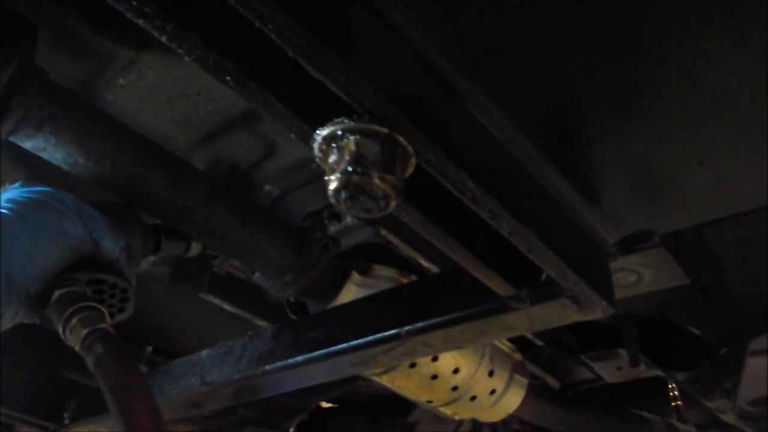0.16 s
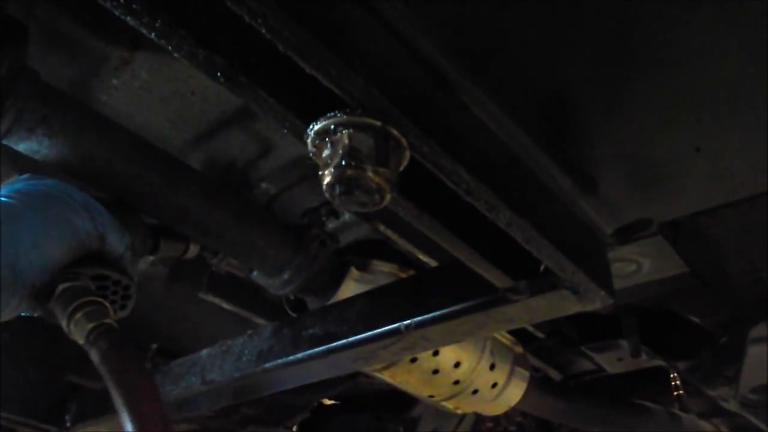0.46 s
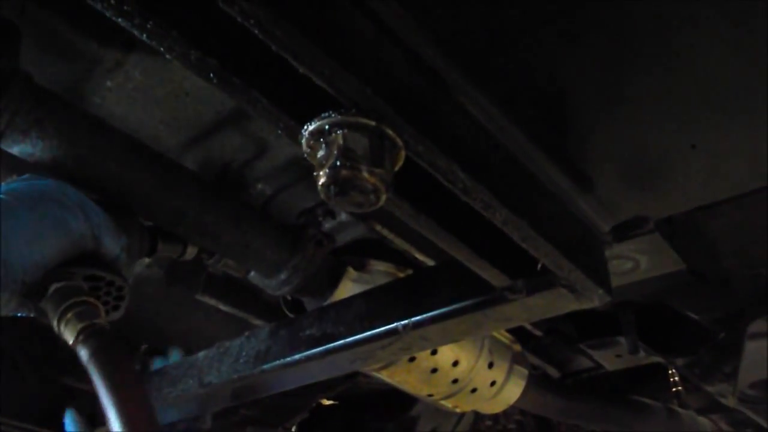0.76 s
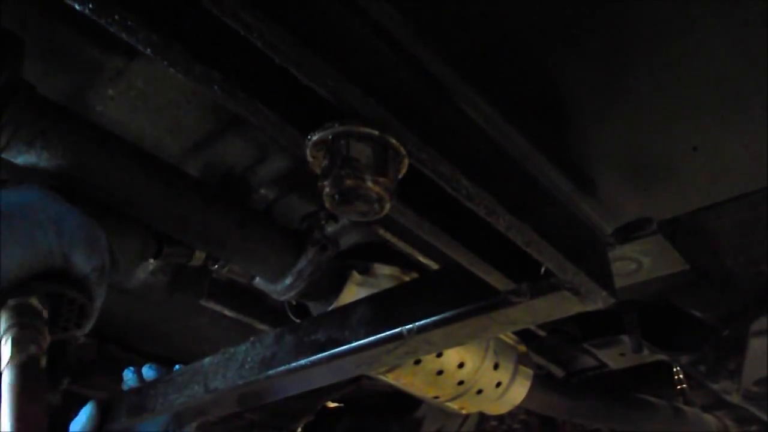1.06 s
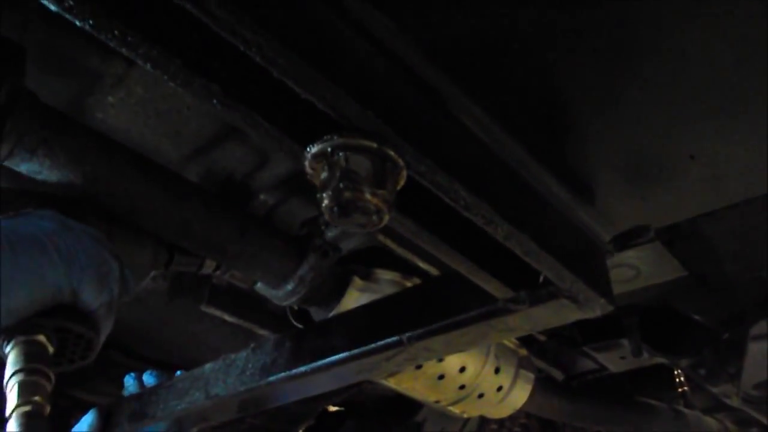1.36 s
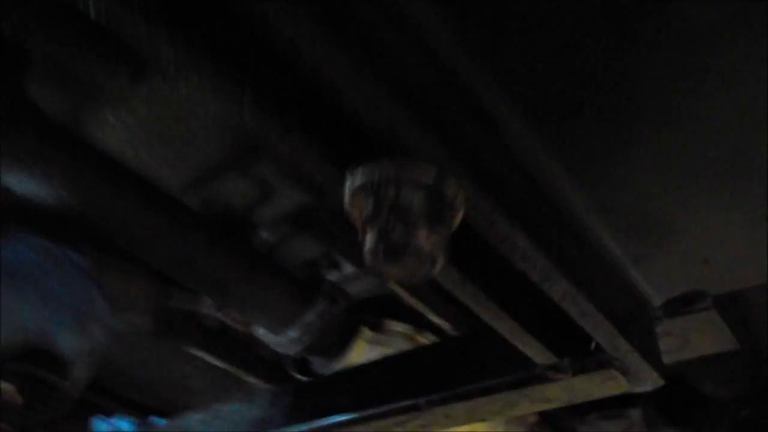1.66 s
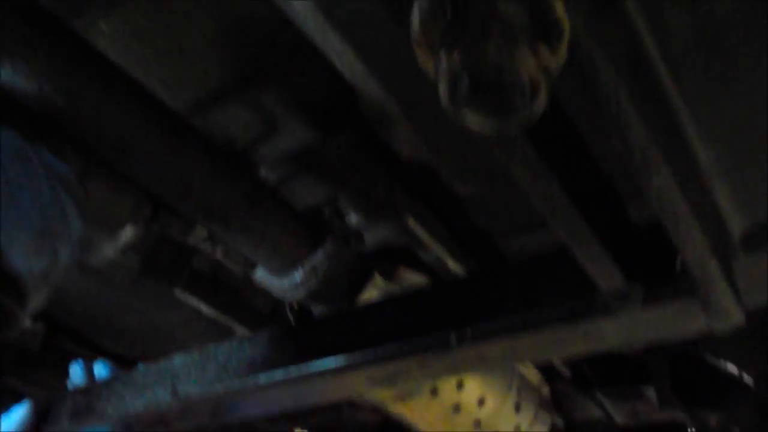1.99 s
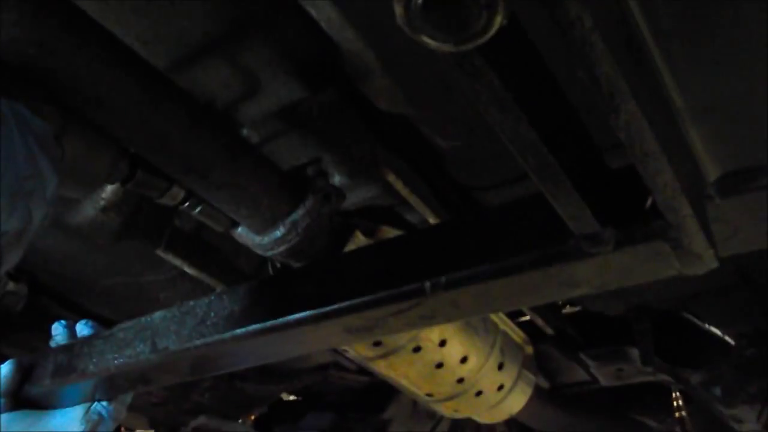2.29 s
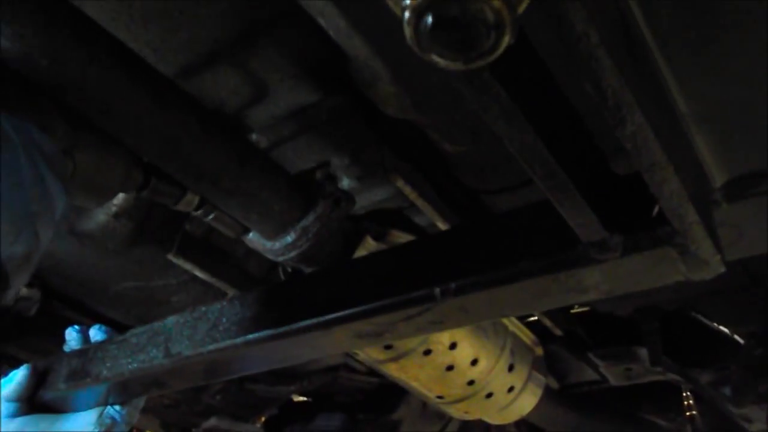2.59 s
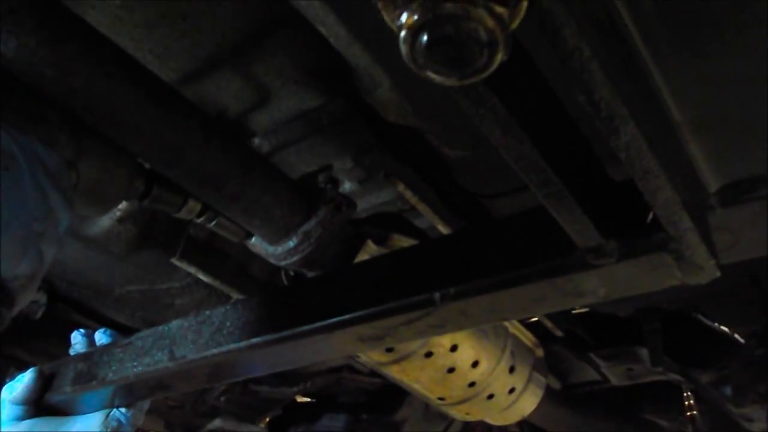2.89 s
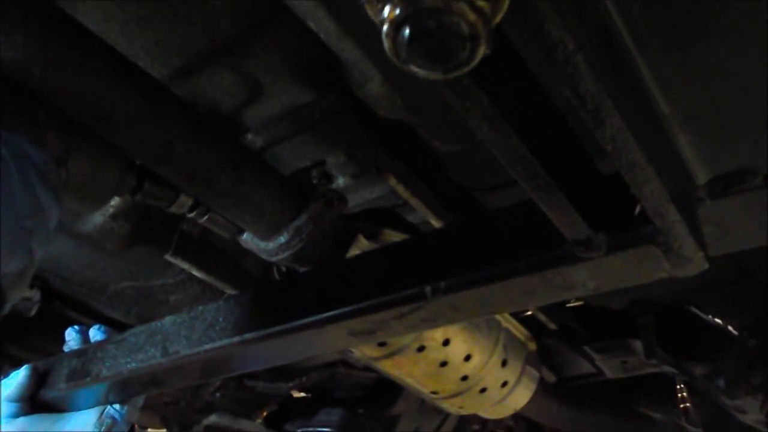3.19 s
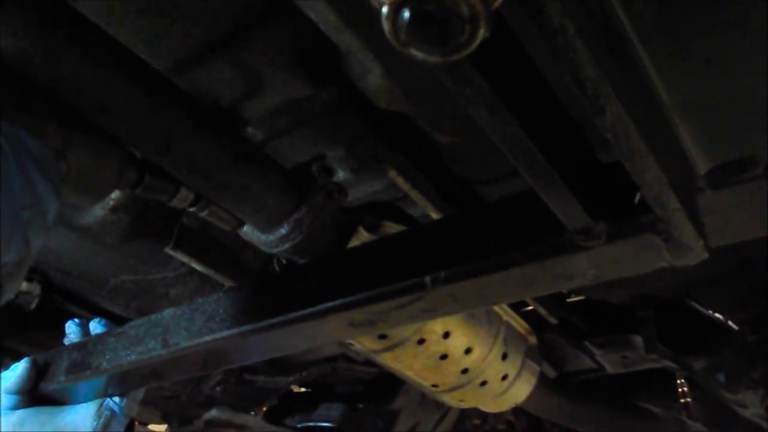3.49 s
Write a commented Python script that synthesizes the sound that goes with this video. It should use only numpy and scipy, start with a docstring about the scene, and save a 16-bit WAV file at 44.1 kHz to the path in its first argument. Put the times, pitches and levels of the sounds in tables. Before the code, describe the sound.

A pneumatic chisel works on a rusted bolt beneath a car. Faint steel knocks come at 0 to 0.5 s, then around 0.95 s, ending in a hard bright rap at 1.1 s that echoes in the garage. Air hisses with a rising whistle from 1.55 s. From 1.73 s harsh hammering, about 17 blows a second, clangs and flutters, overloading the close microphone until the cut at about 3.65 s. Thin whine and faint noise lie behind.

```python
"""A few light knocks and a hard rap of steel, a hiss of air, then hammering at about 17 blows a second.
An air chisel works on a rusted bolt under a car in a garage, close to a small microphone.
Knocks and blows are noise bursts that ring the steel; the hiss is shaped noise from the opening valve.
Between blows the exhaust flutters in quickening pressure puffs that overload the microphone.
Low gusts, a thin electric whine and a noise floor lie behind; decaying noise makes the garage echo."""
import sys
import numpy as np
from scipy import signal
from scipy.fft import rfft, irfft, next_fast_len
from scipy.io import wavfile
from scipy.ndimage import uniform_filter1d

SR = 44100
rng = np.random.default_rng(int(sys.argv[2]) if len(sys.argv) > 2 else 0)


def dump(signal):
    """Clip the signal to [-1, 1] and save it as 16-bit WAV at the path in sys.argv[1]."""
    limited = np.clip(np.atleast_2d(signal).T, -1, 1)
    pcm = np.round(limited * 32767).astype(np.int16)
    wavfile.write(sys.argv[1], SR, pcm)


N = 160965   # length in samples

# Colour of the blows. Each row: frequency in Hz, relative level in dB per Hz.
CLANG_COLOUR = [(180, -17), (652, -10), (953, -2.5), (1240, -1), (2980, 0), (8560, -10), (15500, -26.5)]
# Resonances of bolt and frame. Each row: frequency in Hz, width in Hz, relative level in dB.
STEEL_MODES = [(420, 70, -3), (1375, 80, -1), (1895, 28, 8), (2208, 35, 6), (3060, 130, 3), (3530, 30, 0),
               (8560, 50, -8)]
CLANG_DB, STEEL_RING_DB, CRACK_DB = -16.5, -1.5, -1
CHATTER_T60_S, CRACK_T60_S, CHATTER_ROUGH_DB = 0.21, 0.18, 7.5   # t60: time to fall by 60 dB
BLOW_LAG_S, MODE_SPREAD_DB = 0.003, 8   # blows fall just after each run of puffs
# The loose bit rattles in its holder
TICKS_PER_S, TICK_DB, TICK_SPREAD_DB, TICK_T60_S = 100, 2.5, 3, 0.01

# Runs of exhaust puffs. Each row: first puff in seconds, last puff in seconds, number of puffs.
PUFF_RUNS = [(1.7288, 1.7718, 7), (1.7992, 1.8257, 6), (1.8517, 1.8828, 7), (1.9068, 1.9389, 7),
             (1.9621, 1.9993, 8), (2.0152, 2.0495, 7), (2.0818, 2.1078, 6), (2.1295, 2.1564, 6),
             (2.193, 2.224, 7), (2.2535, 2.2882, 7), (2.3128, 2.3508, 7), (2.3706, 2.401, 7),
             (2.43, 2.4579, 6), (2.4808, 2.5061, 6), (2.5327, 2.5664, 7), (2.5926, 2.6257, 7),
             (2.6463, 2.6772, 6), (2.7041, 2.7407, 7), (2.7639, 2.8029, 7), (2.8381, 2.8673, 6),
             (2.8833, 2.9062, 6), (2.9381, 2.9726, 7), (2.9939, 3.0297, 7), (3.0537, 3.0818, 6),
             (3.1043, 3.1322, 6), (3.1701, 3.2044, 7), (3.2284, 3.2608, 7), (3.2837, 3.3196, 7),
             (3.3586, 3.3864, 6), (3.4185, 3.4472, 6), (3.4624, 3.4954, 7), (3.5225, 3.5488, 6),
             (3.5688, 3.5927, 6), (3.6132, 3.64, 6)]
FIRST_PUFF_S = 1.6866   # a lone puff as the piston starts
SHORTEST_GAP_S, GAP_GROWTH = 0.003, 1.45   # gaps close in on the shortest
PUFF_DB, PUFF_SPREAD_DB, PUFF_LOW_HZ = 4, 3.5, 94   # level before the filters; low cut
LAST_PUFF_WIDTH_S, PUFF_WIDTH_PER_GAP = 0.00016, 0.011
JET_DB, JET_T60_S, JET_HZ = -51, 0.045, 2430   # each puff carries a spit of hiss
DIP_HZ, DIP_WIDTH_HZ, DIP_SHARE = 588, 255, 0.5   # the port passes little here
PORT_HZ, PORT_WIDTH_HZ, PORT_DB = 956, 98, 3.5   # the exhaust port rings after each puff
CHAMBER_HZ, CHAMBER_WIDTH_HZ, CHAMBER_DB = 170, 12.7, 3   # the cylinder booms under it

# Hiss of the opening valve. Each row: time in seconds, level in dB.
AIR_LEVEL = [(1.548, -47), (1.556, -21), (1.65, -9.5), (1.686, -14), (1.725, -12.5), (1.74, -50)]
# Colour of that hiss. Each row: frequency in Hz, relative level in dB per Hz.
AIR_COLOUR = [(656, -7.5), (1040, 5), (1910, -2.5), (3700, 0.5), (5030, -7), (9920, 2), (15500, -12)]
# Resonances of the air pipes. Each row: frequency in Hz, width in Hz, relative level in dB.
AIR_PIPES = [(1060, 110, 6), (6200, 690, 6), (7500, 200, 5), (9730, 140, 14.5)]
AIR_RING_DB = -4.5
# Whistle of a throat in the valve. Each row: time in seconds, frequency in Hz, level in dB.
WHISTLE_PATH = [(1.552, 2544, -34.5), (1.65, 2582, -16), (1.728, 2800, -16), (1.74, 2960, -32)]
# Tone of the filling cylinder. Each row: time in seconds, frequency in Hz, level in dB.
CAVITY_PATH = [(1.556, 568, -51), (1.582, 423, -28), (1.635, 180, -48), (1.67, 150, -36)]
WHISTLE_WIDTH_HZ, CAVITY_WIDTH_HZ = 300, 80

# Knocks of the tool on the car. Each row: start in seconds, level in dB, t60 of the contact in seconds.
KNOCKS = [(0.0, -30.5, 0.27), (0.287, -32.5, 0.18), (0.369, -35, 0.36), (0.464, -28, 0.094),
          (0.484, -28.5, 0.074), (0.497, -40, 0.045), (0.928, -32, 0.17), (.951, -20.5, 0.053),
          (1.048, -15.5, 0.14), (1.084, -13, 0.093), (1.1, 0, 0.074)]
# Colour of the knocks. Each row: frequency in Hz, relative level in dB per Hz.
KNOCK_COLOUR = [(300, -17.5), (800, -12), (1100, -8.5), (2200, 2), (3200, -5), (4200, -12.5), (15000, -42)]
# Resonances rung by the knocks. Each row: frequency in Hz, width in Hz, relative level in dB.
KNOCK_MODES = [(216, 15, -3), (450, 31, -1.5), (974, 51, -1.5), (1740, 30, 11.5), (2220, 55, -14)]
KNOCK_RING_DB = -1.5
# Bright clicks among the knocks. Each row: start in seconds, level in dB, t60 in seconds.
CLICKS = [(1.049, -17.5, 0.036), (1.085, -3, 0.036), (1.095, -4.5, 0.058)]
TREBLE_HZ = 5200   # the clicks fill the octave above this

# Low buffeting at the microphone. Each row: time in seconds, level in dB.
GUSTS = [(1.05, -64), (1.15, -23.5), (1.5, -44), (1.7, -24), (1.99, -20), (2.03, -12), (2.08, -20),
         (3.65, -25)]
GUST_TOP_HZ = 54
WHINE_HZ, WHINE_DB = 10650, -40.5
WHINE_FLIP_S, WHINE_ONE_FLIP_S, WHINE_EDGE = 0.01236, 0.5549, 27   # flip spacing, time of one flip, sharpness
# Colour of the steady noise floor. Each row: frequency in Hz, relative level in dB per Hz.
FLOOR_COLOUR = [(20, -18), (98, -4.5), (162, -19.5), (840, -23.5), (8270, -34.5), (10600, -33),
                (15700, -43)]
FLOOR_DB = -43.5

# How fast the garage echo dies. Each row: frequency in Hz, t60 in seconds.
GARAGE_DECAY = [(1800, 0.61), (9000, 0.63), (14000, 0.05)]
TOOL_ROOM_DB, EXHAUST_ROOM_DB = -6, -20.5   # how strongly each one feeds the echo
LIMIT_DB, RELEASE_DB_PER_S = 0.1, 1128
MIC_LOW_HZ, CUTOFF_HZ = 28.6, 15850


def amp(db):
    """Turn decibels into a plain factor."""
    return 10 ** (np.asarray(db) / 20)


def rms_one(x):
    """Scale to an average strength (rms) of 1."""
    return x / np.sqrt(np.mean(x ** 2) + 1e-20)


def butter(order, hz, kind, x):
    """Filter a sound with a smooth low, high or band filter."""
    return signal.sosfilt(signal.butter(order, hz, kind, fs=SR, output="sos"), x)


def curve(rows):
    """Gain in time from rows of seconds and dB; practically silent outside them."""
    s, db = np.transpose(rows)
    return amp(np.interp(np.arange(N) / SR, s, db, left=-120, right=-120))


def at_hz(points, hz):
    """Read a table between its rows, along a logarithmic frequency scale."""
    table = np.array(points)
    return np.interp(np.log(hz), np.log(table[:, 0]), table[:, 1])


def resonance(x, hz, width_hz):
    """A part that rings at one frequency; the narrower, the longer it rings."""
    r = np.exp(-np.pi * width_hz / SR)
    feedback = [1, -2 * r * np.cos(2 * np.pi * hz / SR), r * r]
    return signal.lfilter([(1 - r * r) / 2, 0, (r * r - 1) / 2], feedback, x + 1e-18)


def body(x, spectrum, peaks=(), ring_db=0, strengths=None):
    """A broad colour that keeps white noise at its rms, plus resonances, each with its own drive if given."""
    size = next_fast_len(N + 4096)
    hz = np.maximum(np.arange(size // 2 + 1) * SR / size, 1)
    gain = rms_one(amp(at_hz(spectrum, hz)))
    out = irfft(rfft(x, size) * gain, size)[:N]
    top = amp(ring_db) * gain.max()
    for k, (hz, width, db) in enumerate(peaks):
        drive = x if strengths is None else x * strengths[k]
        out = out + top * (-1) ** k * amp(db) * resonance(drive, hz, width)   # alternate signs
    return out


def bursts(times, dbs, t60s):
    """Sudden starts that die away exponentially; where they overlap, the louder one counts."""
    out, t = np.zeros(N), np.arange(N) / SR
    for s, db, t60 in zip(times, dbs, t60s):
        i = int(max(s, 0) * SR)
        out[i:] = np.maximum(out[i:], amp(db - 60 * t[:N - i] / t60))
    return out


def rattle(chatter, first_s):
    """Random small ticks of the loose bit, thinning in strength after each blow."""
    born = (rng.random(N) < TICKS_PER_S / SR) & (np.arange(N) > first_s * SR)
    spread = np.minimum(rng.exponential(1, N), 3)
    ticks = born * np.sqrt(chatter) * amp(TICK_DB + TICK_SPREAD_DB * spread)
    decay_per_sample = amp(-60 / (TICK_T60_S * SR))
    return signal.lfilter([1], [1, -decay_per_sample], ticks + 1e-18)


def chisel():
    """Each blow cracks, then the bit chatters unevenly on the bolt and keeps the steel ringing."""
    s = np.array(PUFF_RUNS)[:, 1] + BLOW_LAG_S
    chatter = bursts(s, s * 0, s * 0 + CHATTER_T60_S)
    crack = bursts(s, s * 0 + CRACK_DB, s * 0 + CRACK_T60_S)
    # Every blow favours other resonances
    favour = np.tanh(rng.standard_normal((len(STEEL_MODES), len(s))))
    blow = np.maximum(np.searchsorted(s, np.arange(N) / SR) - 1, 0)
    strengths = amp(MODE_SPREAD_DB * favour)[:, blow]
    uneven = amp(CHATTER_ROUGH_DB * rms_one(uniform_filter1d(rng.standard_normal(N), size=40)))
    envelope = uneven * chatter + crack + rattle(chatter, s[0])
    noise = envelope * rng.standard_normal(N)
    return amp(CLANG_DB) * body(noise, CLANG_COLOUR, STEEL_MODES, STEEL_RING_DB, strengths)


def puff_times():
    """List each puff's time, width and random level draw; a longer gap after it makes it broader."""
    puffs = [(FIRST_PUFF_S, LAST_PUFF_WIDTH_S, 0)]
    for first, last, count in PUFF_RUNS:
        count = round(count)
        share = GAP_GROWTH ** -np.arange(count - 1.)
        spare = last - first - len(share) * SHORTEST_GAP_S
        gaps = SHORTEST_GAP_S + spare * share / share.sum()
        widths = LAST_PUFF_WIDTH_S + PUFF_WIDTH_PER_GAP * (np.append(gaps, gaps[-1]) - gaps[-1])
        times = first + np.append(0, np.cumsum(gaps))
        puffs += zip(times, widths, rng.standard_normal(count))
    return puffs


def exhaust():
    """One-sided pressure puffs, each with a spit of hiss, ring the port and boom in the cylinder."""
    out, t = np.zeros(N), np.arange(-300, 301) / SR
    puffs = puff_times()
    for s, width, draw in puffs:
        i = int(s * SR)
        out[i - 300:i + 301] += amp(PUFF_DB + PUFF_SPREAD_DB * draw) * np.exp(-.5 * (t / width) ** 2)
    s, _, draw = np.transpose(puffs)
    spits = bursts(s, JET_DB + PUFF_SPREAD_DB * draw, s * 0 + JET_T60_S) * rng.standard_normal(N)
    hiss = butter(1, [JET_HZ / 2, 2 * JET_HZ], "band", spits)
    out = butter(2, PUFF_LOW_HZ, "high", out)
    out = out - DIP_SHARE * resonance(out, DIP_HZ, DIP_WIDTH_HZ)
    boom = amp(CHAMBER_DB) * resonance(out, CHAMBER_HZ, CHAMBER_WIDTH_HZ)
    ring = amp(PORT_DB) * resonance(out, PORT_HZ, PORT_WIDTH_HZ)
    return out + hiss + boom + ring


def swept(rows, width_hz):
    """Noise in a narrow band whose centre and level follow rows of seconds, Hz and dB."""
    s, hz, db = np.transpose(rows)
    slow = butter(2, width_hz / 2, "low", rng.standard_normal((2, N)))
    phase = 2 * np.pi * np.cumsum(np.interp(np.arange(N) / SR, s, hz)) / SR
    band = slow[0] * np.cos(phase) + slow[1] * np.sin(phase)
    return curve(np.transpose([s, db])) * rms_one(band)


def valve():
    """Air rushes through the pipes as broad hiss, with a rising whistle and a falling cylinder tone."""
    noise = body(rng.standard_normal(N), AIR_COLOUR, AIR_PIPES, AIR_RING_DB)
    hiss = curve(AIR_LEVEL) * rms_one(noise)
    return hiss + swept(WHISTLE_PATH, WHISTLE_WIDTH_HZ) + swept(CAVITY_PATH, CAVITY_WIDTH_HZ)


def knocks():
    """Short rough contacts with a soft start ring the frame."""
    envelope = uniform_filter1d(bursts(*np.transpose(KNOCKS)), size=120)
    return body(rng.standard_normal(N) * envelope, KNOCK_COLOUR, KNOCK_MODES, KNOCK_RING_DB)


def clicks():
    """Bright ticks among the knocks: short bursts of treble noise without ringing steel."""
    high = butter(2, [TREBLE_HZ, 2 * TREBLE_HZ], "band", rng.standard_normal(N))
    return high * bursts(*np.transpose(CLICKS))


def garage(x):
    """Echo of the walls: octave bands of noise, each dying at its own rate."""
    t, tail = np.arange(SR) / SR, 0
    for low in 60 * 2. ** np.arange(8):
        band = butter(2, [low, 2 * low], "band", rng.standard_normal(SR))
        decay = amp(-60 * t / at_hz(GARAGE_DECAY, low * np.sqrt(2)))
        tail = tail + band * decay * np.minimum(t / 0.0059, 1)   # the echo builds up over 5.9 ms
    return signal.fftconvolve(x, tail / np.sqrt(np.sum(tail ** 2)))[:N]


def gusts():
    """Buffeting as lumpy low noise that swells and fades."""
    low = butter(2, [6, GUST_TOP_HZ], "band", rng.standard_normal(N))
    return curve(GUSTS) * rms_one(low)


def whine():
    """A high electric tone whose sign flips regularly."""
    t = np.arange(N) / SR
    sign = np.tanh(WHINE_EDGE * np.sin(np.pi * (t - WHINE_ONE_FLIP_S) / WHINE_FLIP_S))
    return amp(WHINE_DB) * np.sqrt(2) * sign * np.sin(2 * np.pi * WHINE_HZ * t)


def noise_floor():
    """Steady coloured noise under everything."""
    return amp(FLOOR_DB) * body(rng.standard_normal(N), FLOOR_COLOUR)


def scene():
    """Add up tool, exhaust, their echo and the background, as one channel."""
    tool = chisel() + valve() + knocks() + clicks()
    puffs = exhaust()
    echo = garage(amp(TOOL_ROOM_DB) * tool + amp(EXHAUST_ROOM_DB) * puffs)
    return (tool + puffs + echo + gusts() + whine() + noise_floor())[None]


def record(dry):
    """A fast limiter ducks everything after each peak; then clipping, a low cut and a steep top cut."""
    ramp = RELEASE_DB_PER_S * np.arange(N) / SR
    over = np.maximum(20 * np.log10(np.abs(dry) + 1e-9) - LIMIT_DB, 0)
    held = np.maximum.accumulate(over + ramp, axis=1) - ramp   # ducking in dB, easing at a steady rate
    out = np.clip(dry * amp(-held), -1, 1)
    out = butter(1, MIC_LOW_HZ, "high", out)
    out = signal.sosfilt(signal.ellip(12, .5, 60, CUTOFF_HZ, fs=SR, output="sos"), out)
    return np.clip(out, -1, 1)


dry = scene()
out = record(dry)
dump(out)
```